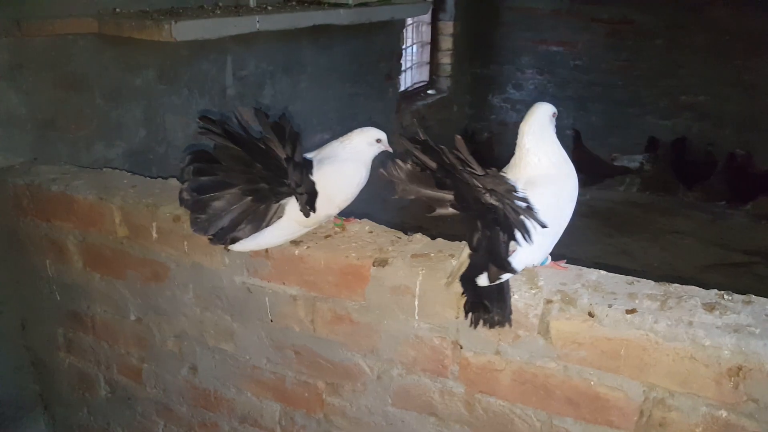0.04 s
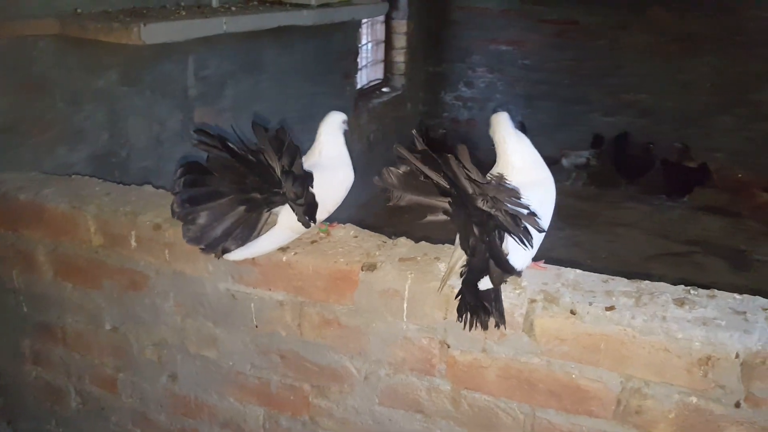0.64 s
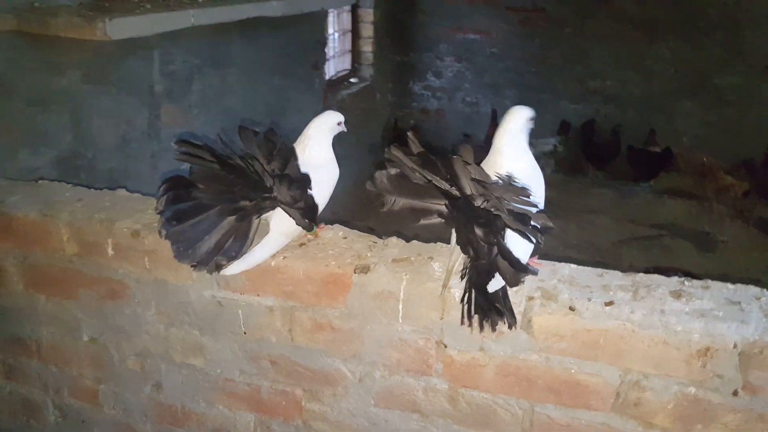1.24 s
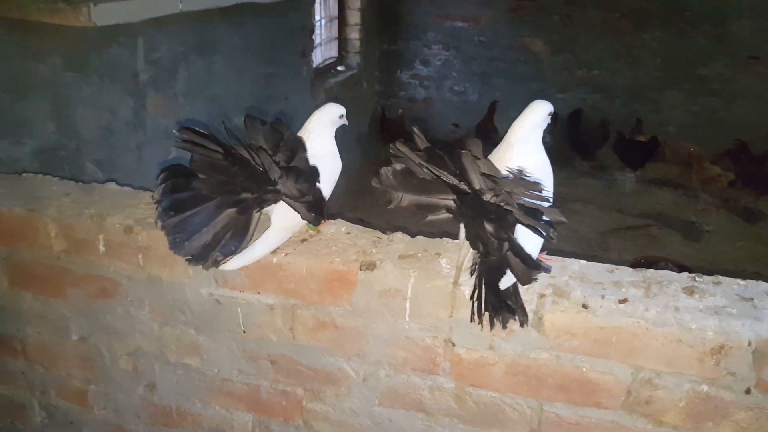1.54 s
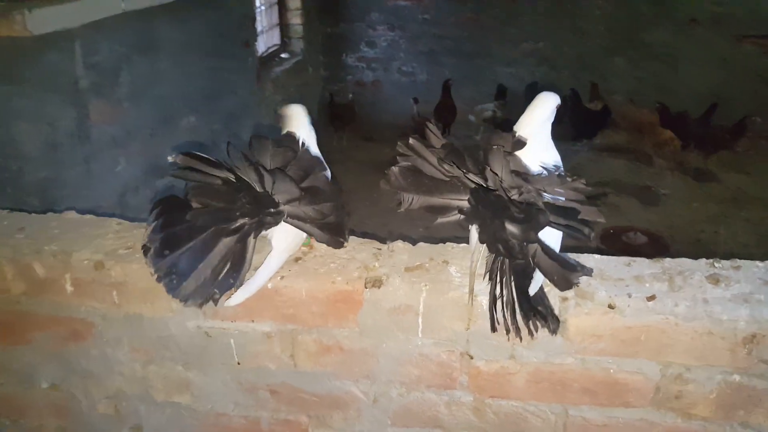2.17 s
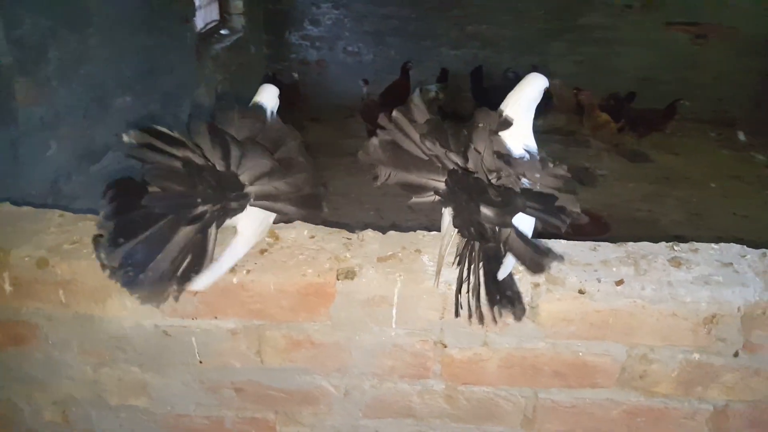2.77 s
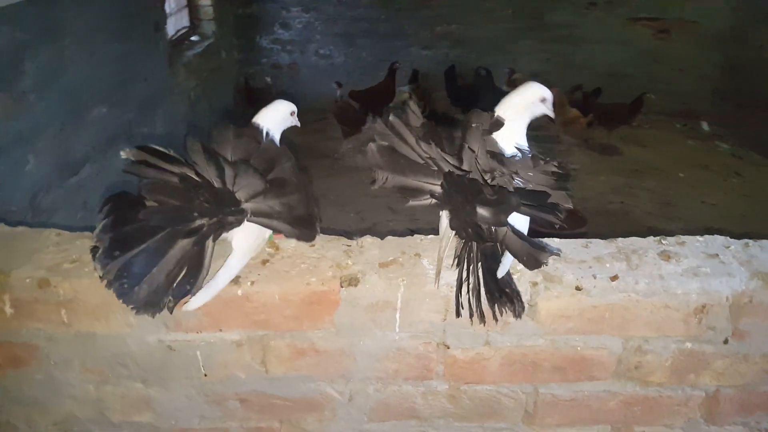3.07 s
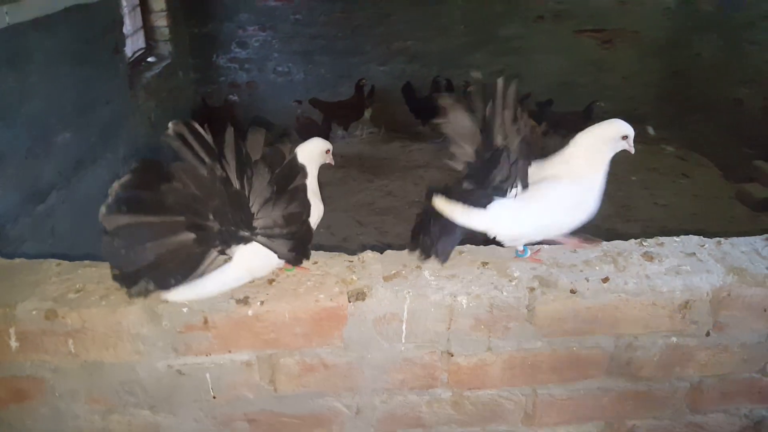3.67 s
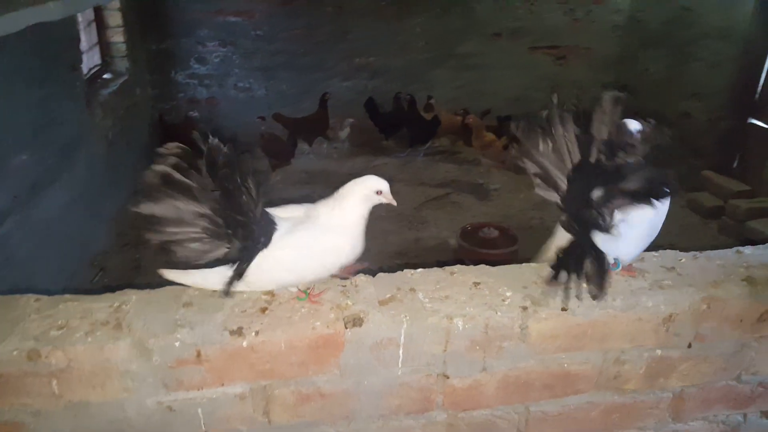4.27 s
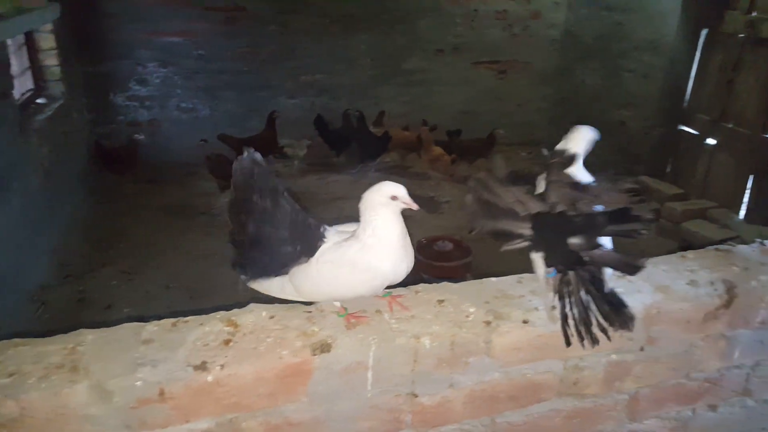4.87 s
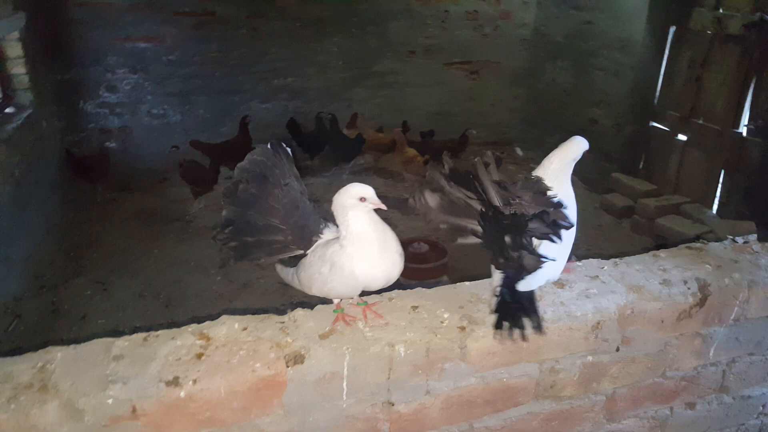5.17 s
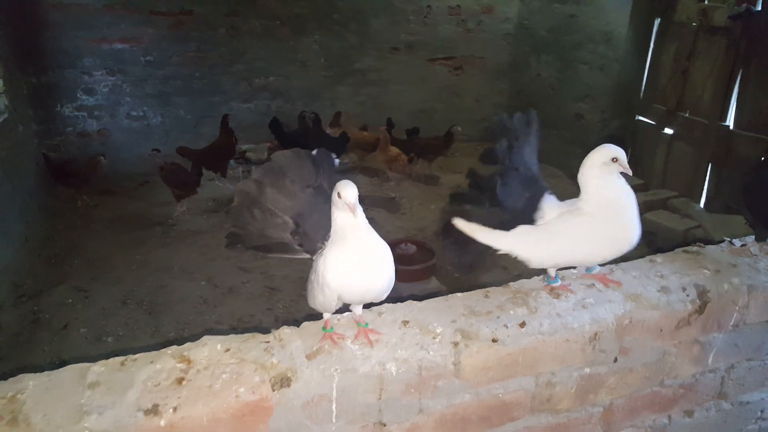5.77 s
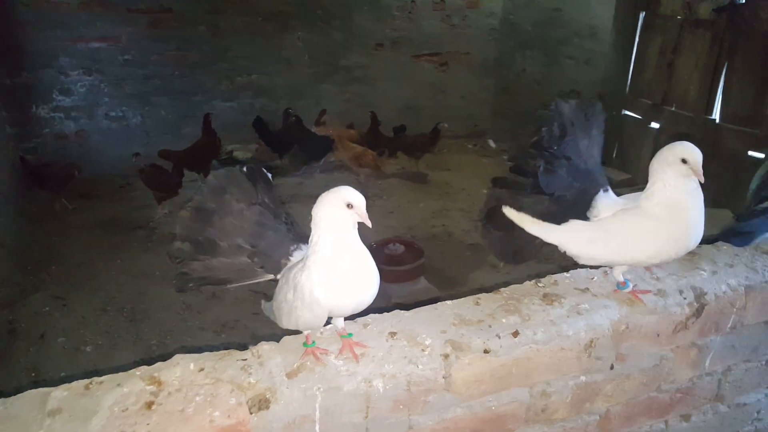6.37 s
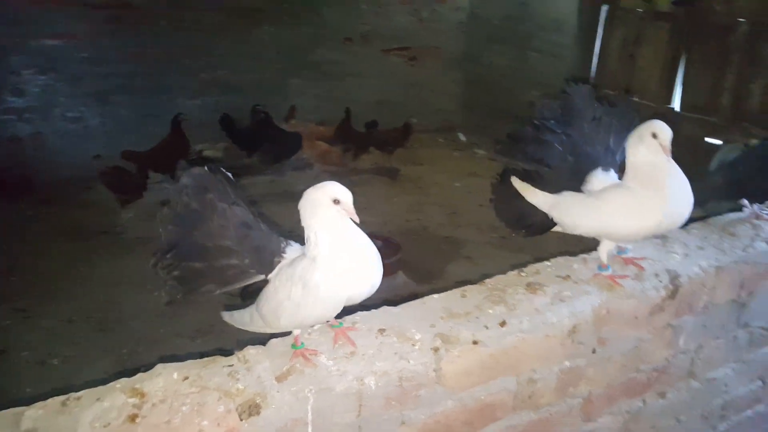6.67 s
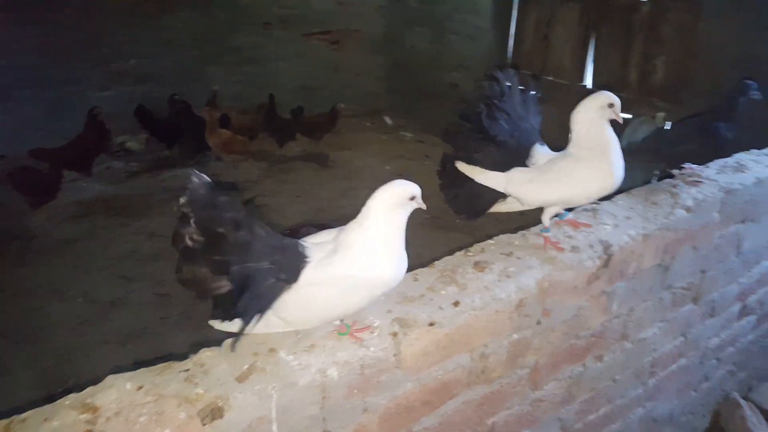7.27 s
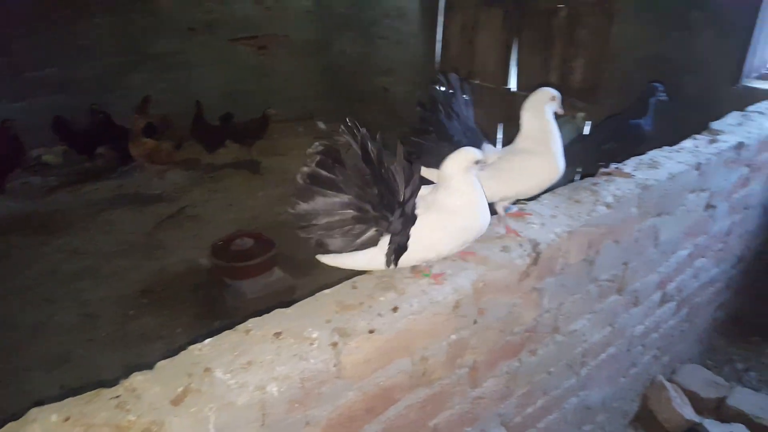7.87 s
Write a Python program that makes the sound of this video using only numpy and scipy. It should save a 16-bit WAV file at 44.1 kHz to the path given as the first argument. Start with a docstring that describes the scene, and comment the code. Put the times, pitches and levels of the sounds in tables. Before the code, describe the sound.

Two pigeons flap their wings in two close bursts in a small brick loft, while a chick peeps faintly behind them.

```python
"""A small brick loft, heard close up on a phone with two microphone ports. Two pigeons flap in two
bursts: each wing stroke puffs air and scrapes feathers, some thump or swish, quills flick, wing tips
clap, and the draught rings the low modes of the room. Claws tick on the brick.
Further back a chick peeps in bouts and hens cluck. Dull thuds come in through the walls,
and tiny high tings sit on a soft bed of outside air."""
import sys
import numpy as np
from scipy import signal
from scipy.fft import rfft, irfft
from scipy.io import wavfile
from scipy.ndimage import uniform_filter1d

SR = 44100
rng = np.random.default_rng(int(sys.argv[2]) if len(sys.argv) > 2 else 0)


def dump(signal):
    """Clip the signal to [-1, 1] and save it as 16-bit WAV at the path in sys.argv[1]."""
    limited = np.clip(np.atleast_2d(signal).T, -1, 1)
    pcm = np.round(limited * 32767).astype(np.int16)
    wavfile.write(sys.argv[1], SR, pcm)


N = 349713
TIME = np.arange(N) / SR

# reverb time of the loft: (frequency [Hz], t60 [s])
LOFT_T60 = [(100, 0.63), (400, 0.26), (2500, 0.19), (7000, 0.11), (15000, 0.11)]
# tone of the background bed: (frequency [Hz], level [dB])
YARD_EQ = [(26, -33), (45, 2), (95, -9), (135, 1), (174, -4.5), (421, -10), (580, -7), (1070, -16.5),
           (1480, -8.5), (2240, -13), (2940, -16.5), (3570, -20), (4800, -20.5), (6610, -26.5), (8870, -40),
           (14900, -34.5), (16000, -35)]
# thin high tings: (time [s], level [dB])
TINGS = [(3.544, -38), (3.797, -49), (4.129, -47), (4.38, -58), (4.44, -56), (5.324, -54), (5.745, -59),
         (5.85, -62), (6.118, -48), (6.53, -54), (6.912, -50), (7.168, -56), (7.802, -49)]
# distant thuds: (time [s], rise [s], knock [dB], boom [dB], rasp [dB])
THUDS = [(1.954, 0.0022, -39, -43.5, -47), (5.262, 0.01, -38, -47, -42.5),
         (5.674, 0.036, -40, -54.5, -37.5), (6.36, 0.012, -37.5, -47.5, -41.5),
         (7.544, 0.0058, -36.5, -42, -46.5)]
# tone of the three layers of a thud: (frequency [Hz], level [dB])
KNOCK_EQ = [(100, -25), (260, 3.5), (450, -3.5), (850, 4), (1400, -3), (2300, -4.5), (4000, -20),
            (9000, -38)]
BOOM_EQ = [(30, -11), (70, -13), (125, 4.5), (165, 0), (240, -7.5), (600, -21), (2000, -72)]
RASP_EQ = [(500, -9), (1500, 1.5), (2300, 2), (3300, 2), (5000, -3.5), (7000, -11), (9500, -33),
           (15000, -24)]
# hen clucks: (time [s], length [s], pitch [Hz], throat resonance at start [Hz], at end [Hz],
# roughness [0-1], level [dB])
CLUCKS = [(1.449, 0.044, 641, 2140, 1730, 0.18, -45.5), (1.875, 0.029, 1070, 2440, 2030, 0.05, -49),
          (2.5, 0.016, 1095, 2450, 1950, 0.04, -51), (4.827, 0.046, 799, 1510, 1930, 0.22, -46),
          (4.88, 0.04, 920, 1880, 1780, 0.05, -40.5), (6.502, 0.058, 628, 2020, 1800, 0.07, -44.5),
          (7.244, 0.044, 242.5, 1400, 540, 0.05, -36)]
# resonances of a hen's beak: (frequency [Hz], width [Hz], level [dB])
BEAK_FORMANTS = [(1640, 150, -4), (4700, 940, -20)]
# chick peeps: (time [s], length [s], crest pitch [Hz], drop from crest [0-1], crest position [0-1],
# roughness [0-1], level [dB])
PEEPS = [(0.17, 0.065, 3250, 0.11, 0.15, 0.24, -48.5), (0.314, 0.05, 3260, 0.16, .1, 0.3, -47),
         (0.451, 0.055, 3500, 0.09, 0.23, 0, -47.5), (.603, 0.05, 3470, 0.03, 0.14, 0, -44.5),
         (0.744, 0.05, 3450, 0.08, 0.17, .06, -42), (0.901, 0.053, 3446, 0.1, 0.19, 0.15, -43),
         (1.08, 0.055, 3390, 0.09, 0.2, 0, -43.5), (1.37, 0.08, 2726, 0.2, 0.43, 0.2, -50),
         (1.614, 0.058, 3030, 0.15, 0.04, 0.2, -44.5), (1.758, 0.062, 3060, 0.11, 0, 0.2, -41.5),
         (1.896, 0.054, 3200, 0.16, 0.19, 0.5, -44.5), (2.063, 0.047, 2980, 0.14, 0.62, 0.45, -43.5),
         (2.232, 0.072, 3095, 0.34, 0.4, 0.47, -46), (2.4, 0.065, 3115, 0.36, 0.45, 0.42, -45.5),
         (2.604, 0.058, 3120, 0.43, 0.47, 0.35, -42), (3.866, 0.074, 3050, 0.02, 0.46, 0.4, -46.5),
         (4.049, 0.078, 3050, 0.04, 0.65, 0.17, -43), (4.673, 0.069, 2900, 0.17, 0.08, 0.33, -46.5),
         (4.846, 0.061, 3180, 0.26, 0.06, 0.37, -46.5), (5.035, .058, 3190, 0.1, 0.18, 0.2, -46.5),
         (5.171, 0.06, 3190, 0.09, 0.22, .25, -45), (5.331, .061, 3310, 0.12, .25, 0.15, -42),
         (5.492, 0.073, 3184, 0.13, 0.34, 0.43, -44.5), (6.001, 0.048, 3004, 0.15, 0, 0, -46.5),
         (6.131, 0.065, 3106, 0.09, 0.05, .5, -49.5), (6.293, 0.064, 3160, 0.1, 0, 0.4, -49.5),
         (6.448, 0.062, 3040, 0.05, 0.37, 0.5, -50), (6.592, 0.068, 3160, 0.07, .33, 0.45, -48.5),
         (6.769, 0.067, 3110, 0.13, 0.45, 0.83, -47.5), (6.971, 0.066, 3230, 0.15, .2, 0.63, -49),
         (7.476, 0.063, 3130, 0.13, 0.12, .4, -50.5), (7.845, 0.048, 3096, 0.11, 0, 0.4, -46.5)]
# standing waves of the loft: (frequency [Hz], t60 [s], level [dB])
LOFT_MODES = [(43.3, 1.54, -4), (62.8, 0.75, -12.5), (75.8, 0.48, -14), (89.2, 0.41, -23),
              (123.8, 0.52, -9), (148.5, 0.55, -18)]
# strength of the draught, one curve a burst: (time [s], level [dB])
DRAUGHT_CURVES = [
    [(.1, -64), (.15, -50), (.4, -52), (.7, -43), (.93, -39.5), (1.06, -54)],
    [(2.68, -57), (2.9, -50), (2.97, -41), (3.18, -52), (3.3, -31.5), (3.5, -34), (3.78, -39),
     (3.96, -32.5), (4.04, -60)],
]
# claws on brick, quill flicks, wing-tip claps: (time [s], level [dB], ring [Hz], ring [dB], decay [s])
CLAWS = [(3.8522, -15, 5260, -20, 0.00097), (4.2082, -31, 3000, -2, 0.0016),
         (6.5785, -44.5, 3700, 3, 0.0023), (6.585, -44, 1260, 17, 0.0038), (6.759, -52.5, 3400, 1, 0.0033),
         (7.009, -50, 5000, -13, 0.0018)]
FLICKS = [(.136, -37, 850, -8, 0.013), (.224, -28, 1200, -4, 0.009), (.3465, -27.5, 4850, -7, 0.0071),
          (.49, -38, 3300, -18, 0.011), (.642, -33, 1630, -6, 0.0097), (.761, -32, 7630, -5, 0.0042),
          (.879, -28, 1780, -9, 0.0077), (1.007, -35, 2630, -6, 0.01), (1.137, -37, 2640, -2, 0.0076),
          (2.5945, -33, 1210, 1, 0.005), (2.877, -35, 5500, -4, .0045), (2.901, -27, 1620, -11, 0.0042),
          (3.2834, -32, 2290, -16, 0.0049), (3.479, -33, 5500, -12, 0.0035), (3.541, -30, 4570, -3, .004),
          (3.565, -34, 4600, -9, 0.0039), (3.612, -29, 3900, -9, 0.0078), (3.711, -26.5, 1820, -20, 0.0079),
          (3.739, -26, 1105, 3, .007), (3.834, -39, 2400, 0, 0.003), (4.1774, -37, 600, 3, 0.0063)]
CLAPS = [(2.7008, -17.5, 3780, -1, 0.005), (2.7636, -19.5, 1810, -16, 0.0041),
         (3.0222, -24.5, 2220, -22, 0.0044), (3.1452, -22, 1960, -11, .0032),
         (3.3859, -9, 2260, -6.5, 0.005), (3.499, -23.5, 3470, -3, 0.0057)]
# tone of those three contacts: (frequency [Hz], level [dB])
CLAW_EQ = [(200, -2.5), (900, -3), (1500, -12), (3500, -6), (5200, 6), (7300, -8), (9500, -31),
           (12500, -23), (16000, -7)]
FLICK_EQ = [(300, 3), (1400, 8.5), (2500, 10), (5000, 7.5), (7300, -4.5), (9500, -20), (12500, -11),
            (16000, -9)]
CLAP_EQ = [(80, 0), (250, 5), (500, -0.5), (900, 3), (1500, 2.5), (2400, -1.5), (4300, 0.5), (5500, -4),
           (7100, -6.5), (8400, -19.5), (10000, -27), (12500, -17.5), (16000, -22)]
# wings catching the air: (time [s], length [s], pitch [Hz], level [dB])
THUMPS = [(0.199, 0.021, 350, -35), (.226, 0.009, 418, -42), (0.306, 0.016, 505, -38),
          (0.329, .016, 450, -36), (0.353, 0.0093, 350, -43), (.828, 0.035, 224, -28),
          (0.868, 0.02, 398, -27), (1.1, 0.02, 281, -34), (2.767, 0.044, 313, -26.5),
          (3.11, 0.026, 308, -28.5), (3.159, 0.023, 369, -36), (3.318, 0.019, 502, -24),
          (3.381, 0.0068, 297, -21), (3.478, 0.005, 446, -16), (3.498, 0.017, 99, -17),
          (3.543, 0.014, 395, -19.5), (3.586, 0.007, 444, -22), (3.738, 0.014, 345, -15),
          (3.829, 0.019, 338, -27)]
# wings sweeping past: (time [s], length [s], start pitch [Hz], end pitch [Hz], level [dB])
SWISHES = [(2.723, 0.04, 1298, 2504, -32.5), (3.187, 0.018, 1943, 1180, -33.5),
           (3.314, 0.019, 704, 993, -29.5)]
# flapping effort, one curve a burst: (time [s], level [dB])
EFFORT_CURVES = [
    [(0.0, -62), (0.162, -47.5), (0.308, -48.5), (0.634, -52), (0.802, -44), (0.966, -45.5), (1.032, -62),
     (1.216, -58), (1.4, -57.5)],
    [(2.55, -57), (2.72, -44.5), (2.87, -45.5), (3.38, -41.5), (3.5, -35.5), (3.65, -36.5), (3.89, -38.5),
     (4.3, -51), (4.55, -56.5)],
]
# soft rustles, feathers brushing and faint foot shuffles: (time [s], length [s], level [dB])
SOFT_RUSTLES = [(1.048, 0.032, -38), (2.235, 0.054, -64), (4.336, 0.13, -60.5), (4.853, .04, -63),
                (5.089, 0.13, -46.5), (5.22, 0.024, -53), (6.127, .025, -55), (7.382, 0.033, -66),
                (7.843, .05, -58)]
# wing strokes: (time [s], air [dB], feather [dB])
STROKES = [(0.07, -51, -47.5), (0.135, -32, -46), (0.223, -30, -52), (.305, -30.5, -50), (0.346, -37, -56),
           (0.488, -35.5, -48), (0.57, -37.5, -42.5), (0.64, -30, -44), (0.713, -32.5, -39),
           (0.762, -30.5, -48), (0.839, -31.5, -48), (0.873, -29, -40), (1.005, -31.5, -45.5),
           (1.05, -31.5, -40), (1.062, -40, -35.5), (1.099, -38, -66), (1.136, -38.5, -41),
           (1.274, -50, -47.5), (2.593, -44, -44), (2.723, -28, -27.5), (2.758, -48, -44),
           (2.878, -44, -37), (2.903, -29.5, -35), (3.021, -33, -47), (3.151, -27.5, -37),
           (3.282, -55, -52), (3.32, -25.5, -30.5), (3.395, -35, -26), (3.474, -24.5, -36),
           (3.541, -26, -34.5), (3.587, -29, -33), (3.614, -28, -34), (3.65, -24, -40), (3.733, -21, -33),
           (3.859, -29, -39), (3.95, -27.5, -36.5), (3.983, -26, -35.5), (4.073, -38, -31.5),
           (4.176, -48, -56), (4.264, -36, -46)]
# wind-up, beat and wake of each stroke: (delay [s], air [dB], feather [dB], length [s])
STROKE_PARTS = [(-.034, -10.5, -17.5, 0.015), (0, 0.5, -1, 0.0096), (0.039, -20.5, -10.5, 0.014)]
# tone of the air puffs and the feather scrape: (frequency [Hz], level [dB])
AIR_EQ = [(50, -14), (125, -0.5), (170, 2), (235, -5), (310, -0.5), (400, -3.5), (500, -3), (750, -4.5),
          (1200, -12), (2500, -13.5), (6000, -50)]
FEATHER_EQ = [(300, -7), (800, -12.5), (1400, 2.5), (2300, -2), (3000, -2), (3800, 2.5), (4400, -1),
              (5200, -0.5), (7000, -5), (8500, -16), (10000, -24.5), (12500, -14), (16000, -18.5)]


def undb(db):
    """Decibels to gain."""
    return 10 ** (np.asarray(db) / 20)


def unit(x):
    """Scale to rms 1."""
    return x / np.sqrt(np.mean(x ** 2) + 1e-20)


def lookup(points, hz):
    """Read a table on a log-frequency axis."""
    f, value = np.transpose(points)
    return np.interp(np.log(hz + 1), np.log(f), value)


def colour(x, eq, size=8192):
    """Minimum-phase EQ; white noise keeps its power."""
    gain = unit(undb(lookup(eq, np.fft.rfftfreq(size, 1 / SR))))
    cepstrum = irfft(np.log(gain))
    cepstrum[1:size // 2] *= 2
    cepstrum[size // 2 + 1:] = 0
    return signal.fftconvolve(x, irfft(np.exp(rfft(cepstrum))))[:len(x)]


def resonate(x, hz, width_hz):
    """One resonance, gain 1 at its centre."""
    return signal.lfilter(*signal.iirpeak(min(hz, SR / 2 - 500), hz / width_hz, SR), x)


def walk(rate_hz, size=N):
    """Smooth random drift with a spread near 1."""
    knots = np.arange(size) * rate_hz / SR
    return np.interp(knots, np.arange(size), rng.standard_normal(size))


def phase(hz):
    """Running phase of a moving pitch, in radians."""
    return 2 * np.pi * np.cumsum(hz) / SR


def add(track, s, sound):
    """Mix a sound into a track at time s."""
    i = max(int(s * SR), 0)
    track[i:i + len(sound)] += sound[:max(N - i, 0)]


def swell(length):
    """Stroke envelope: quick attack, slower release, peak 1."""
    u = np.arange(int(3 * length * SR)) / (length * SR / 3)
    return (u * np.exp(1 - u)) ** 2


def bursts(curves):
    """Gain ride from one level curve a burst, silent in between."""
    return sum(undb(np.interp(TIME, *np.transpose(rows), left=-200, right=-200)) for rows in curves)


def diffuse(size, port_gap_m=0.13):
    """Noise from all directions at two ports: near mono in the bass, wide in the treble."""
    likeness = 0.97 * np.sinc(2 * np.fft.rfftfreq(size, 1 / SR) * port_gap_m / 343)
    mid, side = rfft(rng.standard_normal((2, size)))
    mid, side = mid * np.sqrt((1 + likeness) / 2), side * np.sqrt((1 - likeness) / 2)
    return irfft(np.array([mid + side, mid - side]), size)


def loft(x, lag_ms, pan_db, direct_db, room_db, linger=1):
    """Direct sound plus a darkening brick-wall tail; lag and pan are left port relative to right."""
    t, hz = TIME[:SR], np.fft.rfftfreq(SR, 1 / SR)
    octaves = 62.5 * 2. ** np.arange(9)
    field, tail = rfft(diffuse(SR)), 0
    for centre, share in zip(octaves, np.eye(len(octaves))):
        band = irfft(field * lookup(np.c_[octaves, share], hz), SR)
        tail = tail + band * np.exp(-np.log(1000) * t / (linger * lookup(LOFT_T60, centre)))
    # rough walls favour no pitch: the stored energy only follows the reverb time
    spectrum = rfft(tail)
    power = uniform_filter1d(np.mean(np.abs(spectrum) ** 2, axis=0), size=45)
    tail = irfft(spectrum * np.sqrt(lookup(LOFT_T60, hz) / (power + 1e-12)), SR)
    gate = np.clip(t / 0.00037 - .3, 0, 1) * (t < .5)
    response = undb(room_db) * unit(tail * gate) / np.sqrt(SR)
    lag = int(round(lag_ms * SR / 1000))
    response[0, max(lag, 0)] += undb(direct_db + pan_db / 2)
    response[1, max(-lag, 0)] += undb(direct_db - pan_db / 2)
    return signal.fftconvolve(x[None], response, axes=1)[:, :N]


def yard(level_db=-54, flicker_db=1.7):
    """The bed: a soft, diffuse murmur of outside air and birds shuffling at the back."""
    air = np.array([colour(port, YARD_EQ) for port in diffuse(N)])
    return unit(air) * undb(level_db - flicker_db * walk(25))


def tings(hz=15050, width_hz=220, decay_s=0.0027):
    """Tiny ticks that ring at the very top of hearing."""
    envelope, t = np.zeros(N), TIME[:SR // 5]
    for s, db in TINGS:
        add(envelope, s, undb(db) * np.exp(-t / decay_s))
    return resonate(envelope * rng.standard_normal(N), hz, width_hz) * np.sqrt(SR / np.pi / width_hz)


def thuds(knock_s=0.061, boom_s=0.078, rasp_s=0.054, boom_late_s=0.05):
    """Far-off blows, blurred on the way in: knock and rasp first, the boom blooming late."""
    t, out = TIME[:SR], 0
    layers = [(KNOCK_EQ, 0, knock_s), (BOOM_EQ, boom_late_s, boom_s), (RASP_EQ, 0, rasp_s)]
    for layer, (eq, late, decay) in enumerate(layers):
        envelope = np.zeros(N)
        for s, rise, *levels in THUDS:
            crest = rise + late
            shape = np.minimum(t / crest, 1) * np.exp(-np.maximum(t - crest, 0) / decay)
            add(envelope, s, undb(levels[layer]) * shape)
        out = out + colour(envelope * rng.standard_normal(N), eq)
    return out


def hens(throat_width_hz=300, dull_hz=5500):
    """Short clucks, hoarse or clear: harmonics pass a sliding throat formant and steady beak ones."""
    out, orders = np.zeros(N), np.arange(1, 23)[:, None]
    for s, length, hz, start_hz, end_hz, rough, db in CLUCKS:
        u = np.linspace(0, 1, int(length * SR))
        pitch = hz * (1 + rough * walk(609, len(u)))
        partials = orders * pitch
        throat = start_hz + (end_hz - start_hz) * u
        formants = sum(undb(peak_db) / (1 + 1j * (partials - centre ** 2 / partials) / width)
                       for centre, width, peak_db in [(throat, throat_width_hz, 0), *BEAK_FORMANTS])
        gain = formants / (1 + (partials / dull_hz) ** 4)
        voice = np.real(gain * np.exp(1j * orders * phase(pitch))).sum(axis=0)
        add(out, s, undb(db) * unit(voice * np.abs(np.sin(np.pi * u)) ** 0.57))
    return out


def chick(waver=0.019, trill=0.11, trill_hz=135, throb_db=9, shimmer_db=5, overtone_db=-22):
    """Reedy whistles that arch and slide down; hoarse ones trill in pitch and throb in level."""
    out = np.zeros(N)
    for s, length, hz, drop, crest, rough, db in PEEPS:
        u = np.linspace(0, 1, int(length * SR))
        span = .27 + .45 * crest
        arch = np.exp(-np.abs((u - crest) / span) ** 2.68)
        rasp = rough * np.sin(phase(trill_hz * (1 + 0.32 * walk(137.7, len(u)))))
        pitch = hz * (1 - drop * (1 - arch) + trill * rasp * (1 + arch) / 2 + waver * walk(728, len(u)))
        whistle = np.sin(phase(pitch)) + undb(overtone_db) * np.sin(2 * phase(pitch))
        throb = np.roll(rasp, int(SR / trill_hz / 4))  # a quarter cycle behind the trill
        tremolo = undb(throb_db * throb + shimmer_db * walk(291, len(u)))
        envelope = np.abs(np.sin(np.pi * u)) ** 0.67 * tremolo
        add(out, s, undb(db) * unit(envelope * whistle))
    return out


def draught(gust_db=-7):
    """Mono low end: air pushed aside by the birds gusts and rings the loft's standing waves."""
    drive, modes = bursts(DRAUGHT_CURVES), 0
    for hz, t60, db in LOFT_MODES:
        # random pushes near the mode's own pitch build it up, then it rings on
        pushes = drive * np.sin(phase(hz * (1 + 0.0705 * walk(35.16))))
        modes = modes + undb(db) * unit(resonate(pushes, hz, np.log(1000) / np.pi / t60))
    gust_eq = [(12, -44), (30, 7), (55, 11), (80, 12), (110, -43), (200, -19), (600, -66)]
    gusts = colour(drive * rng.standard_normal(N), gust_eq)
    return np.sqrt(np.mean(drive ** 2)) * unit(unit(modes) + undb(gust_db) * unit(gusts))


def cracks(hits, eq, ring_width_hz, snap_db, grain_db, snap_s=0.00069):
    """Hard contacts of claw, quill or wing tip: a sharp snap, a short noisy body and one broad ring."""
    out, t = np.zeros(N), TIME[:SR // 20]
    for s, db, hz, ring_db, decay in hits:
        fade = np.exp(-(t / decay) ** 2) + undb(snap_db) * np.exp(-t / snap_s)
        crack = rng.standard_normal(len(t)) * fade * undb(grain_db * walk(1540, len(t)))
        ring = resonate(resonate(crack, hz, ring_width_hz), hz, ring_width_hz)
        sound = unit(colour(crack, eq)) + undb(ring_db) * unit(ring)
        weight = np.sqrt(decay * SR / np.pi / len(t))  # a longer crack carries more energy
        add(out, s, undb(db) * weight * unit(sound))
    return out


def thumps(sink=0.27, wobble=0.16):
    """A wing that catches the air squarely gives a hollow thump of a few cycles, sinking in pitch."""
    out = np.zeros(N)
    for s, length, hz, db in THUMPS:
        envelope = swell(length)
        u = np.linspace(-1, 1, len(envelope))
        pitch = hz * np.exp(-sink * (u + .5) + wobble * walk(hz, len(u)))
        add(out, s, undb(db) * envelope * np.sin(phase(pitch)))
    return out


def swishes(relative_width=0.251):
    """Vortices peel off a fast wing in a narrow noise band whose pitch follows the wing's speed."""
    out = np.zeros(N)
    for s, length, start_hz, end_hz, db in SWISHES:
        envelope = swell(length)
        size, eddy_hz = len(envelope), 2 * relative_width * start_hz
        pitch = np.interp(TIME[:size], [0, length], [start_hz, end_hz])
        eddies = walk(eddy_hz, size) + 1j * walk(eddy_hz, size)
        swish = envelope * np.real(eddies * np.exp(1j * phase(pitch)))
        add(out, s, undb(db) * unit(swish) * np.sqrt(np.mean(envelope ** 2)))
    return out


def effort(rest_db=-58, full_db=-34.5):
    """How hard the birds flap: 0 at rest, about 1 at the hardest."""
    return np.maximum(bursts(EFFORT_CURVES) - undb(rest_db), 0) / undb(full_db)


def wings(air_trim_db=-5.5, air_stretch=1.32, stir_db=-36, rustle_db=-44, flutter_db=4, grain_db=6):
    """Each stroke sheds puffs of turbulent air while the feather vanes scrape in tiny slips."""
    push, scrape = np.zeros(N), np.zeros(N)
    for s, air_db, feather_db in STROKES:
        for delay, part_air_db, part_feather_db, length in STROKE_PARTS:
            add(push, s + delay, undb(air_db + part_air_db + air_trim_db) * swell(length * air_stretch))
            add(scrape, s + delay, undb(feather_db + part_feather_db) * swell(length))
    for s, length, db in SOFT_RUSTLES:
        add(scrape, s, undb(db) * swell(length))
    # between strokes, stirred air and rustle ride the effort
    flutter = unit(undb(flutter_db * walk(90)))
    push = np.hypot(push, undb(stir_db) * effort() * flutter)
    scrape = np.hypot(scrape, undb(rustle_db) * effort() ** 0.56 * flutter)
    slips = unit(rng.standard_normal(N) * undb(grain_db * walk(1100)))
    return colour(push * rng.standard_normal(N), AIR_EQ) + colour(scrape * slips, FEATHER_EQ)


def scene():
    """The mix: wings up close and off to one side, poultry at the back, thuds from outside."""
    near = loft(wings() + swishes(), lag_ms=-.4, pan_db=-7, direct_db=-5.5, room_db=-0.5)
    claps = cracks(CLAPS, CLAP_EQ, ring_width_hz=580, snap_db=-18, grain_db=4)
    near += loft(claps, lag_ms=-.4, pan_db=2.5, direct_db=1.5, room_db=-1.5)
    flicks = cracks(FLICKS, FLICK_EQ, ring_width_hz=790, snap_db=-13, grain_db=0.5)
    near += loft(flicks, lag_ms=-.4, pan_db=-5.5, direct_db=-3.5, room_db=-5.5)
    near += loft(thumps(), lag_ms=-.18, pan_db=0.5, direct_db=-3.5, room_db=-13.5)
    claws = cracks(CLAWS, CLAW_EQ, ring_width_hz=1100, snap_db=-7, grain_db=0)
    near += loft(claws, lag_ms=.1, pan_db=-15.5, direct_db=3, room_db=1.5, linger=0.51)
    poultry = loft(chick(), lag_ms=.07, pan_db=-2, direct_db=-9.5, room_db=-6.5, linger=1.15)
    poultry += loft(hens(), lag_ms=.07, pan_db=-1, direct_db=-8.5, room_db=-7.5)
    far = loft(thuds(), lag_ms=.4, pan_db=-7.5, direct_db=-4, room_db=-3.5)
    sparkle = loft(tings(), lag_ms=0, pan_db=-16, direct_db=1.5, room_db=9)
    return near + draught() + poultry + far + sparkle + yard()


def record(dry, ceiling=0.6, top_hz=15900):
    """A soft limiter rounds off the loudest peaks, and the top is cut steeply."""
    high_cut = signal.ellip(8, .2, 70, top_hz, fs=SR, output="sos")
    return signal.sosfilt(high_cut, ceiling * np.tanh(dry / ceiling))


dry = scene()
out = record(dry)
dump(out)
```